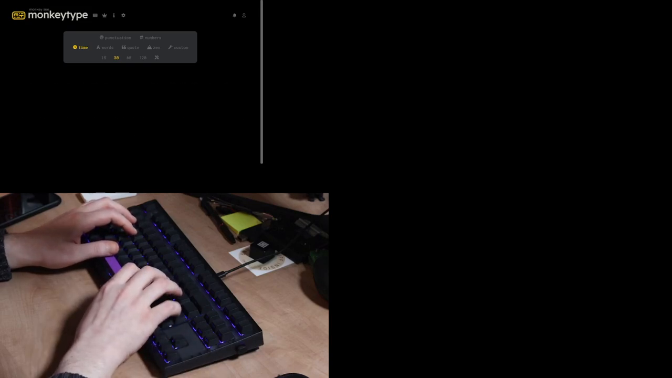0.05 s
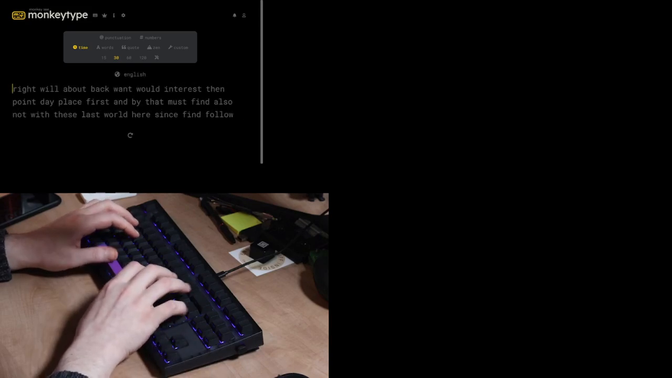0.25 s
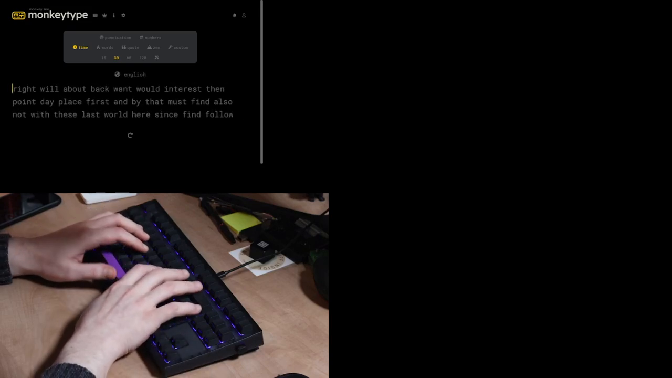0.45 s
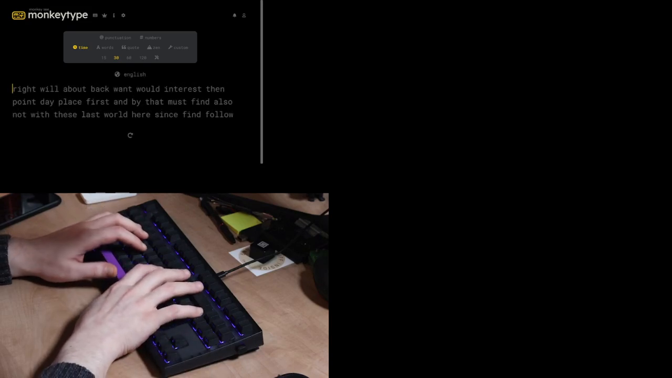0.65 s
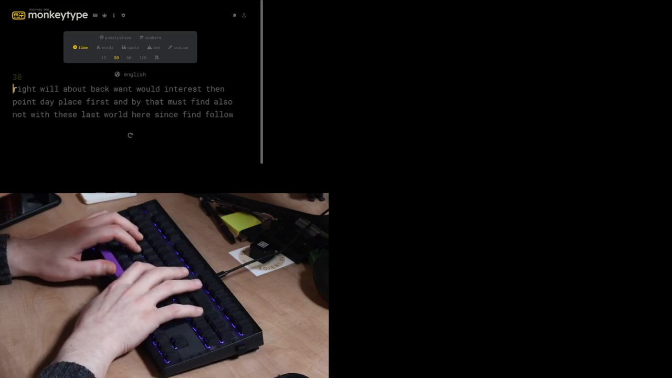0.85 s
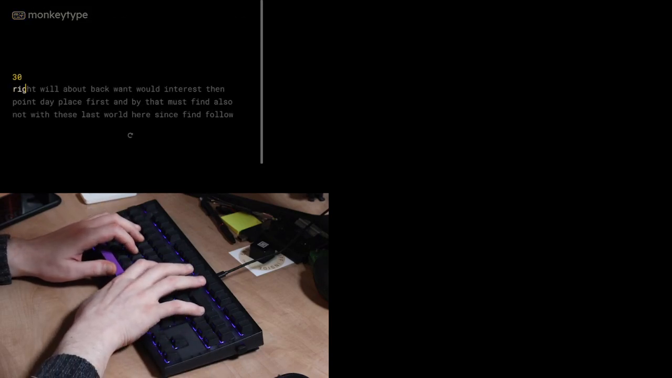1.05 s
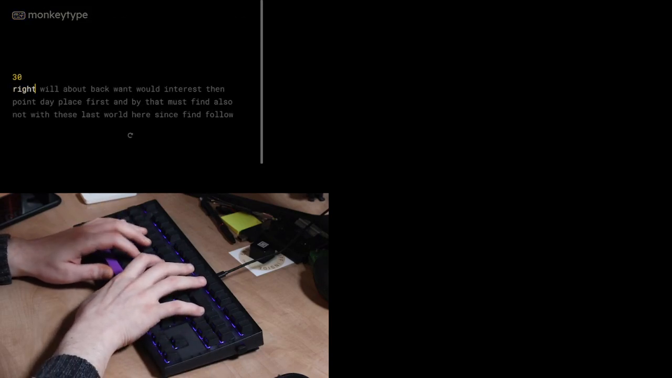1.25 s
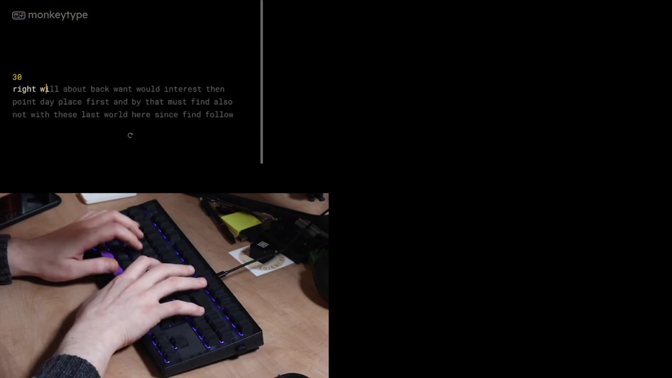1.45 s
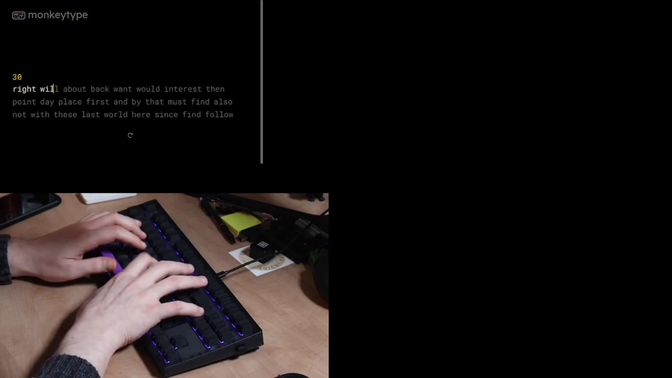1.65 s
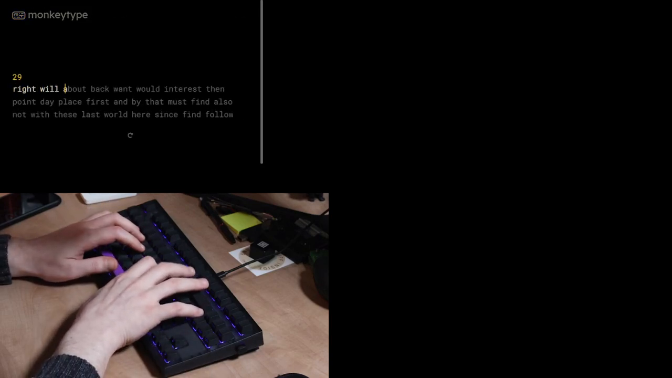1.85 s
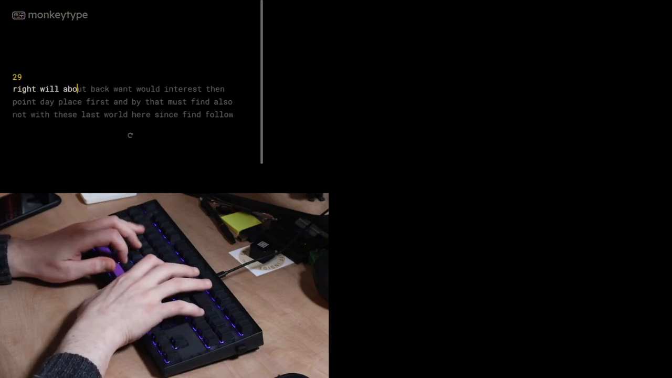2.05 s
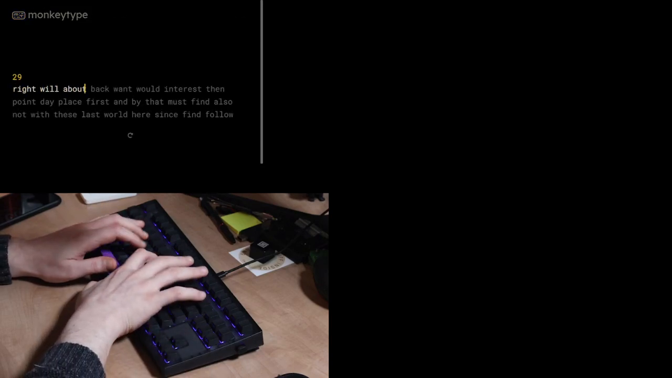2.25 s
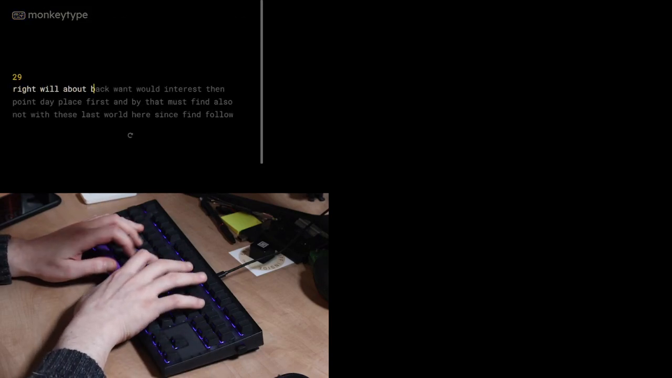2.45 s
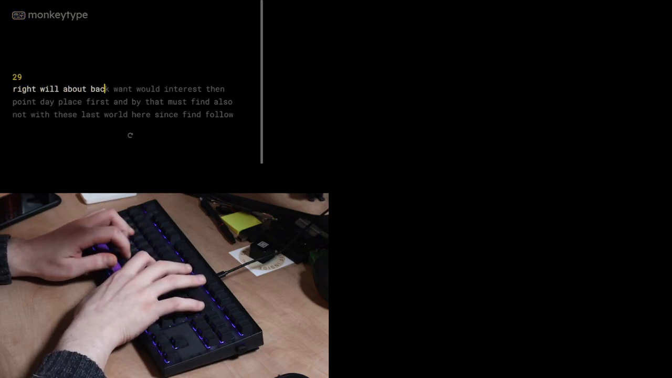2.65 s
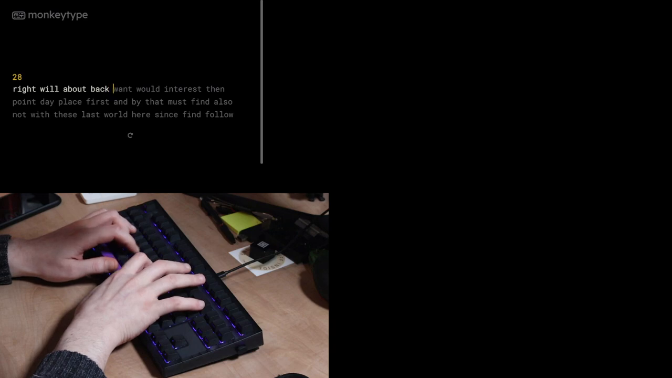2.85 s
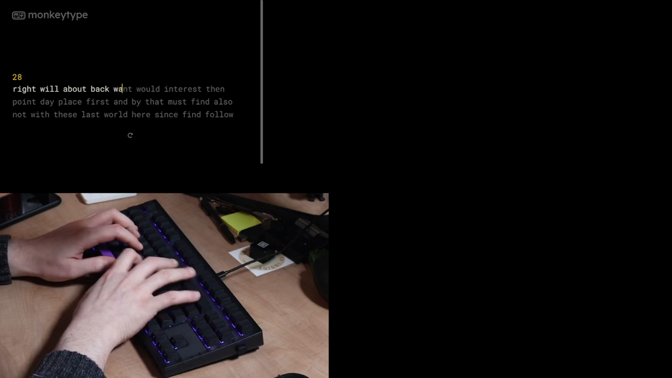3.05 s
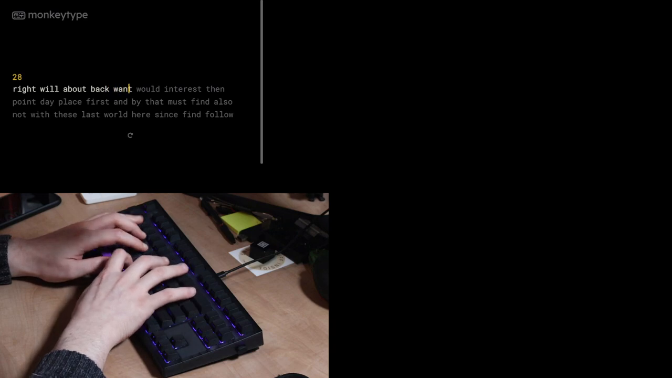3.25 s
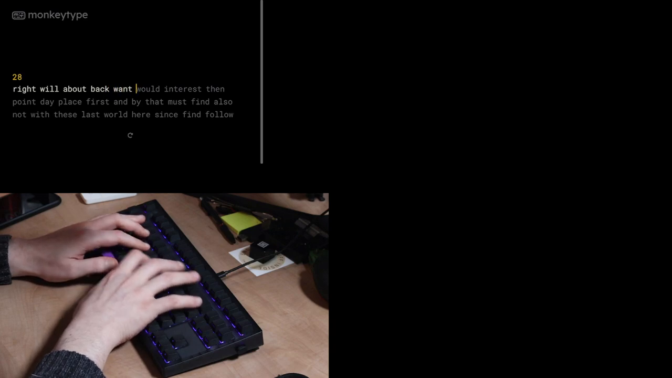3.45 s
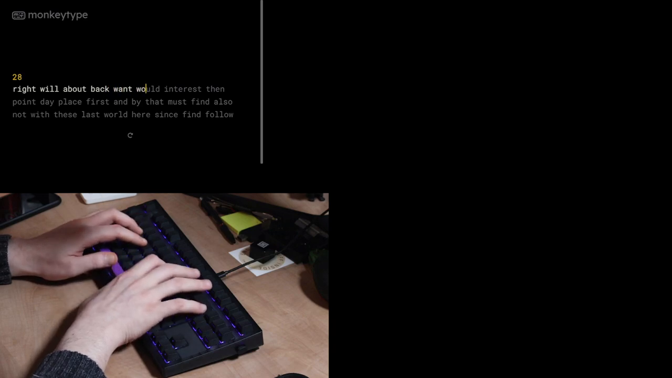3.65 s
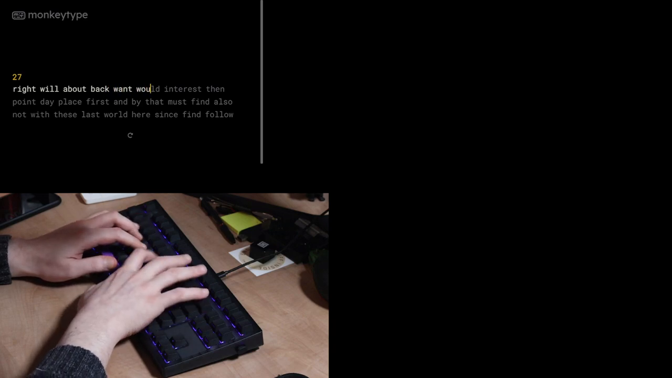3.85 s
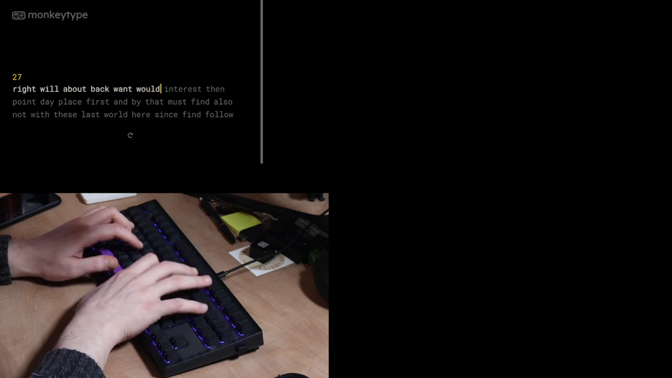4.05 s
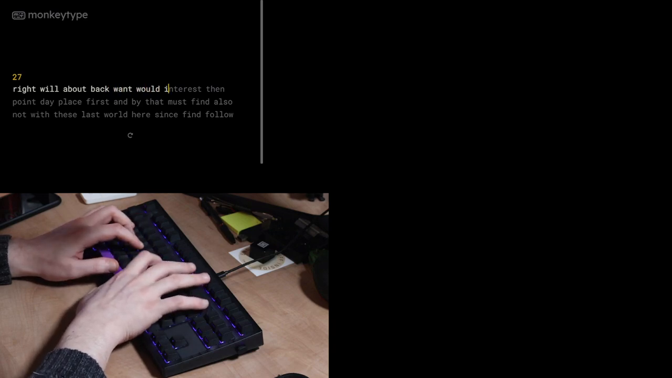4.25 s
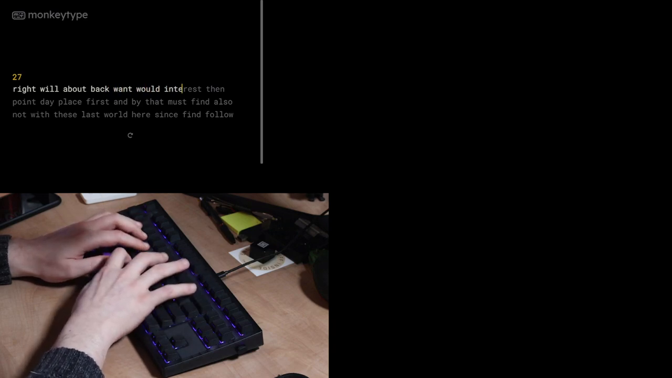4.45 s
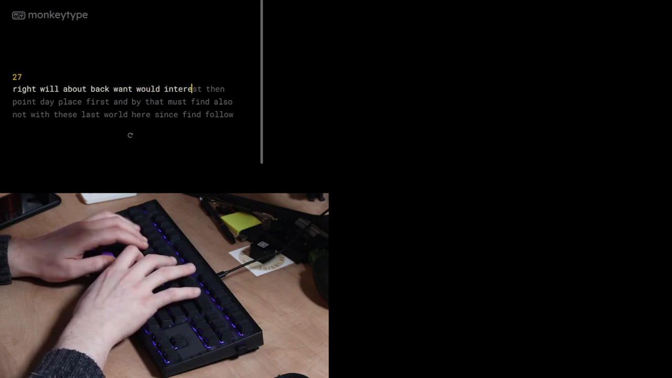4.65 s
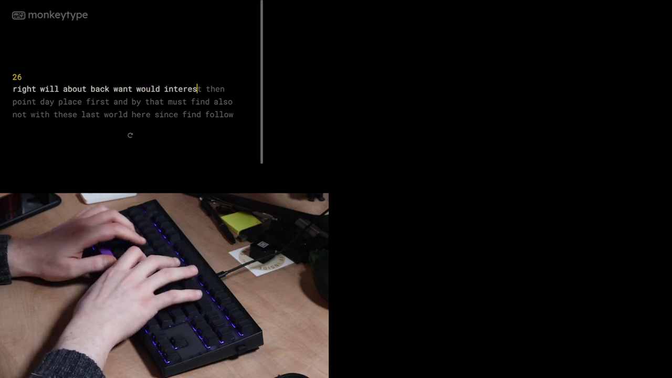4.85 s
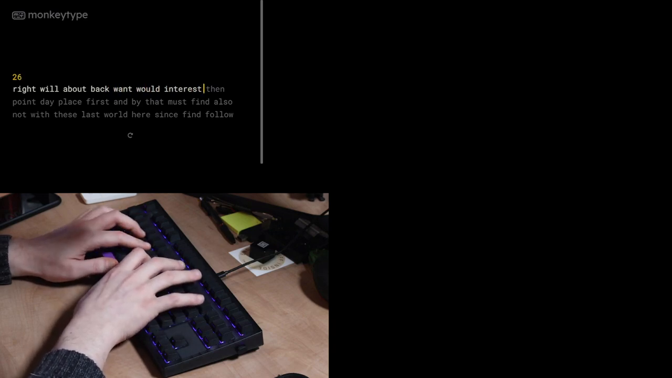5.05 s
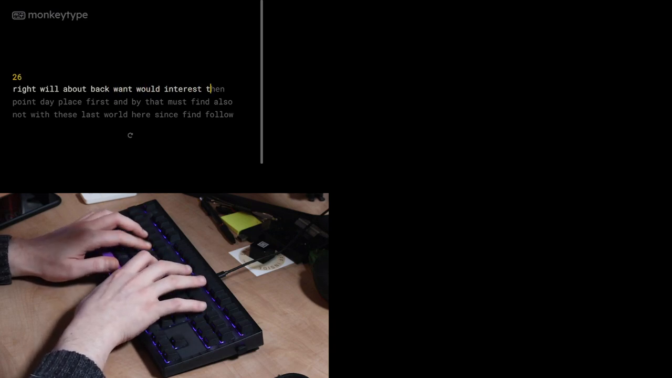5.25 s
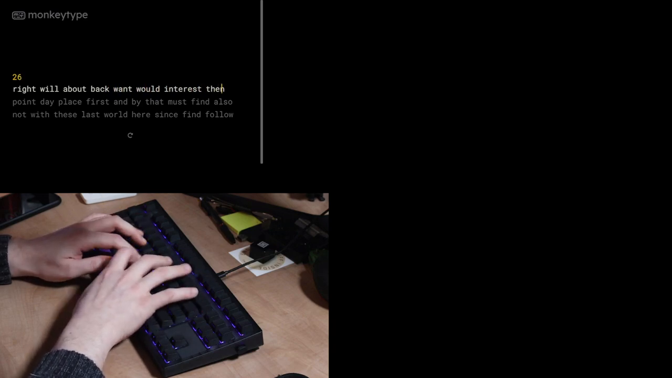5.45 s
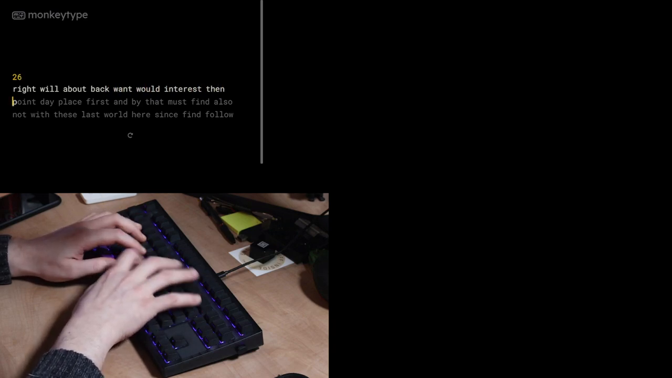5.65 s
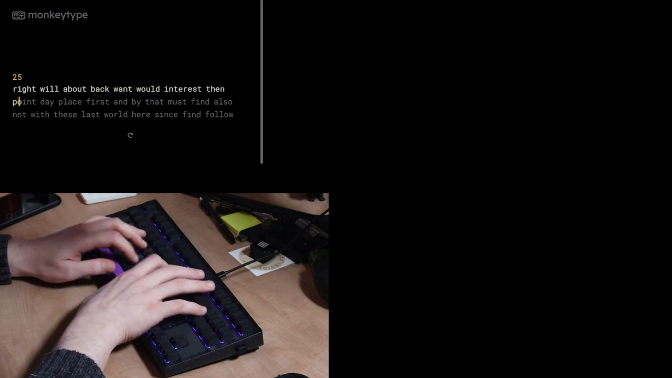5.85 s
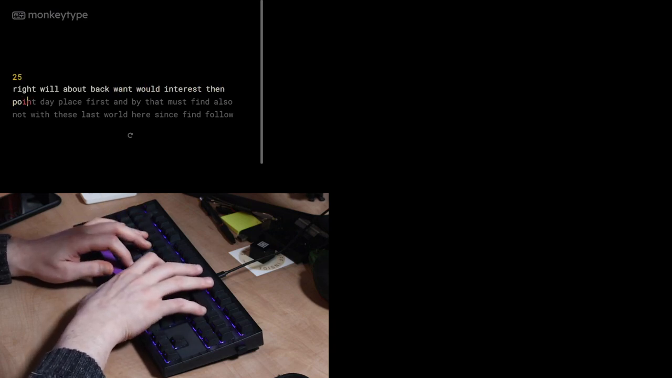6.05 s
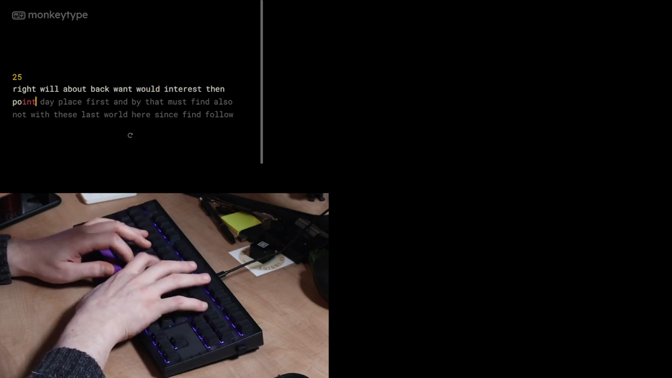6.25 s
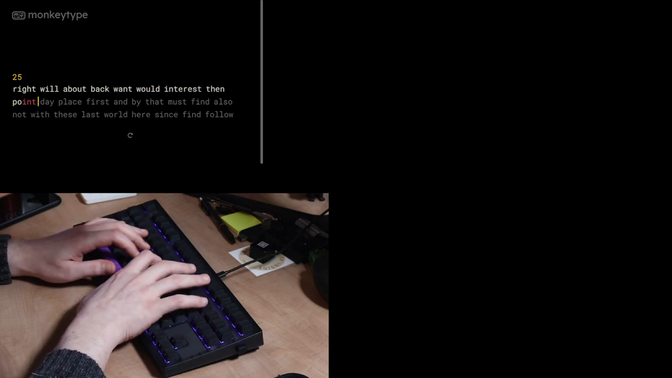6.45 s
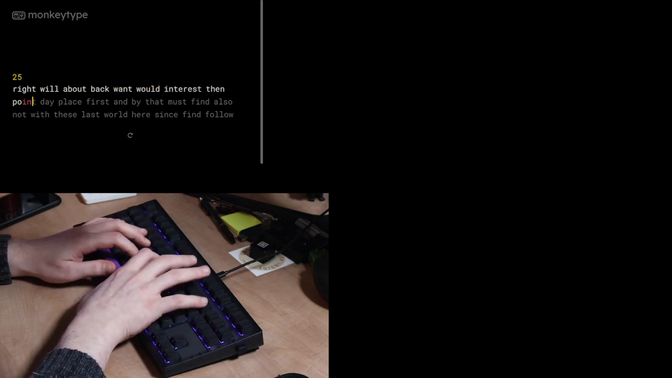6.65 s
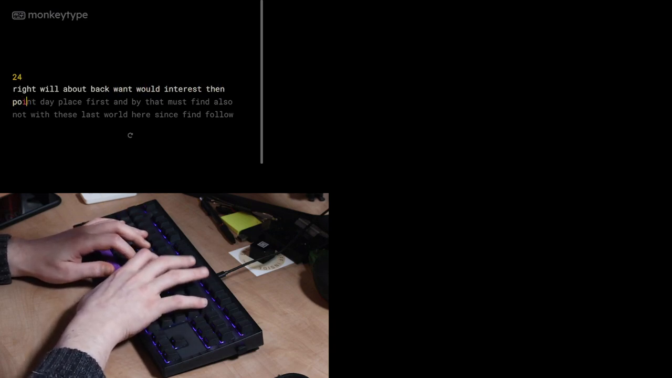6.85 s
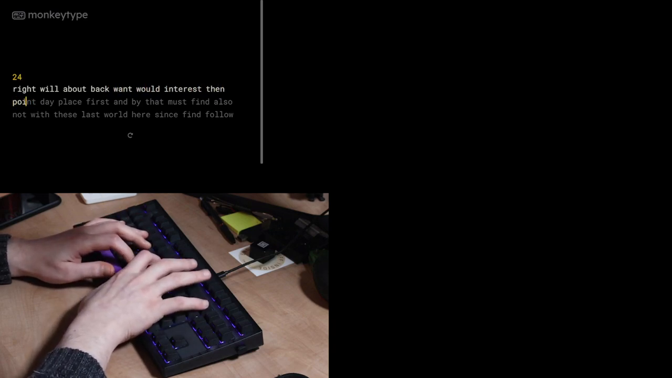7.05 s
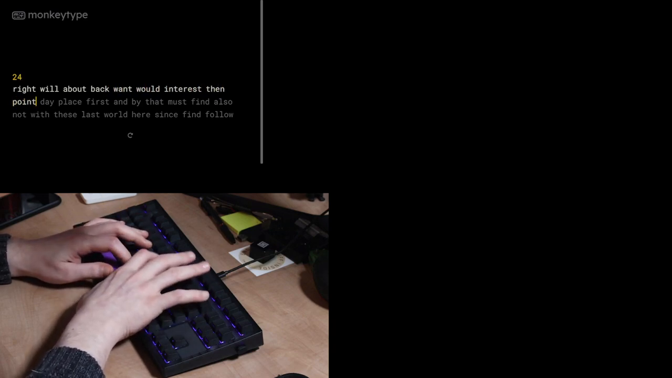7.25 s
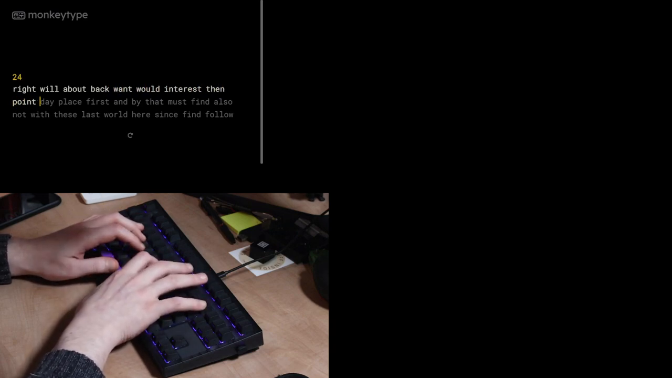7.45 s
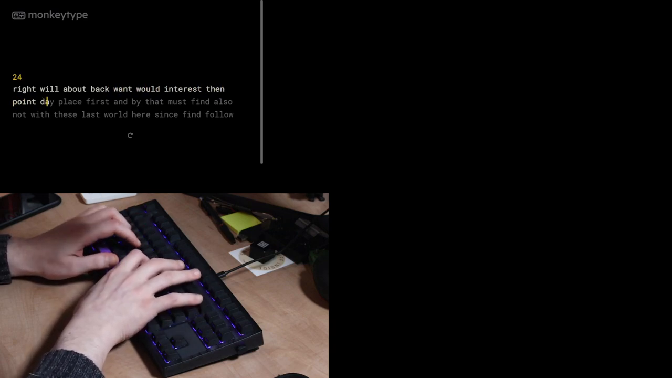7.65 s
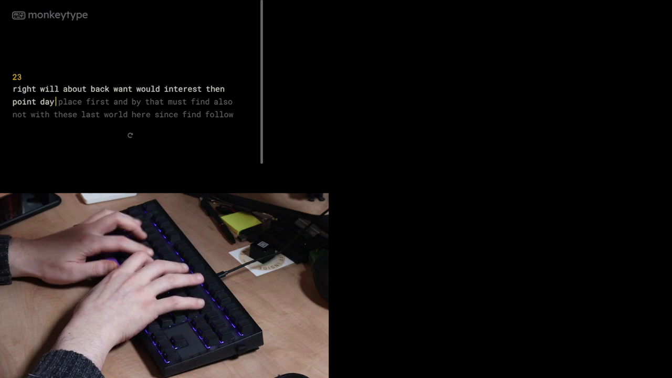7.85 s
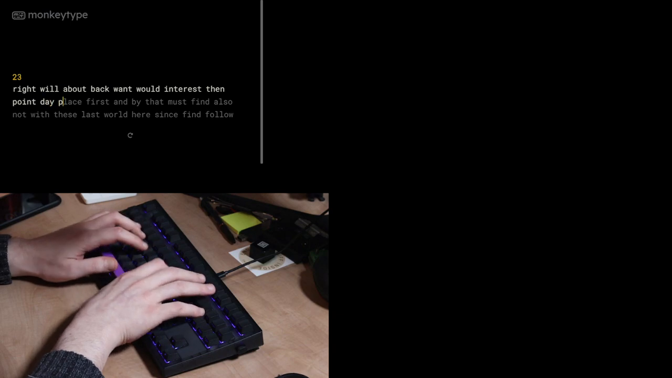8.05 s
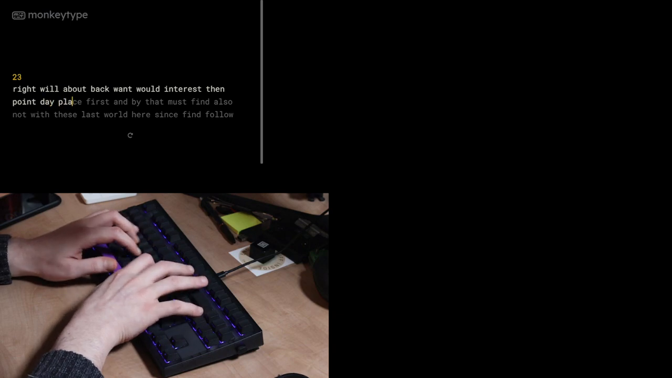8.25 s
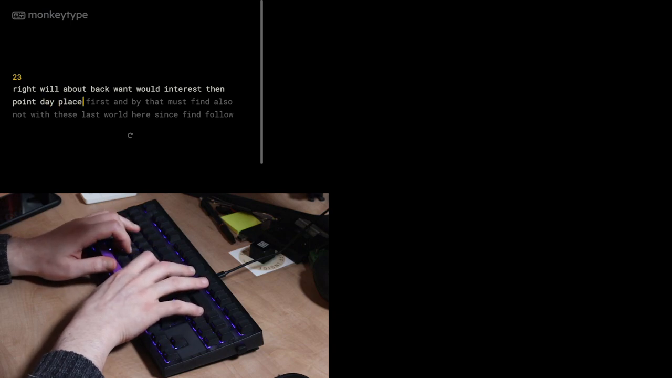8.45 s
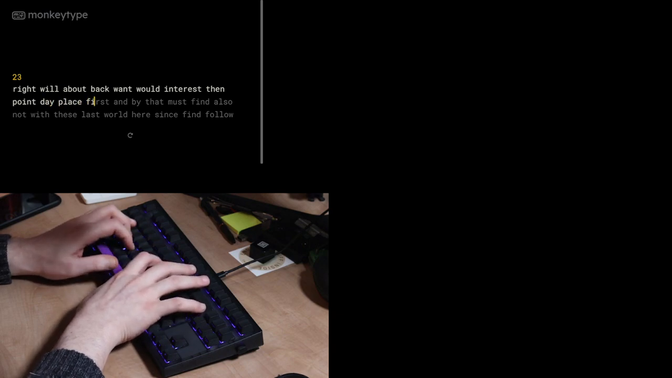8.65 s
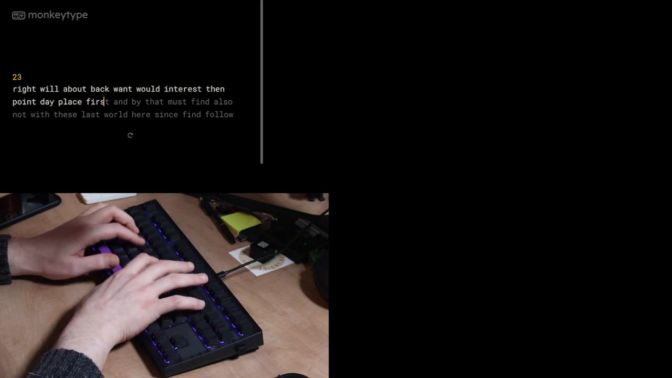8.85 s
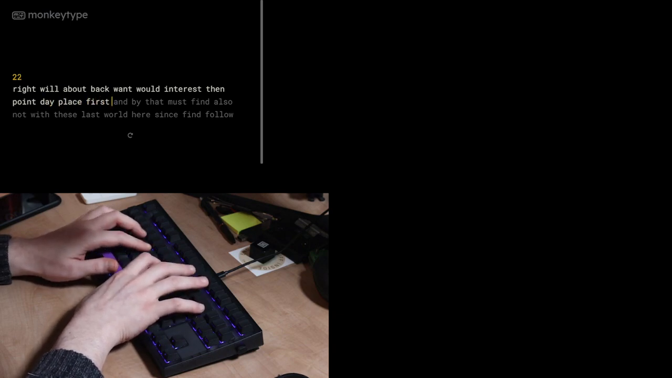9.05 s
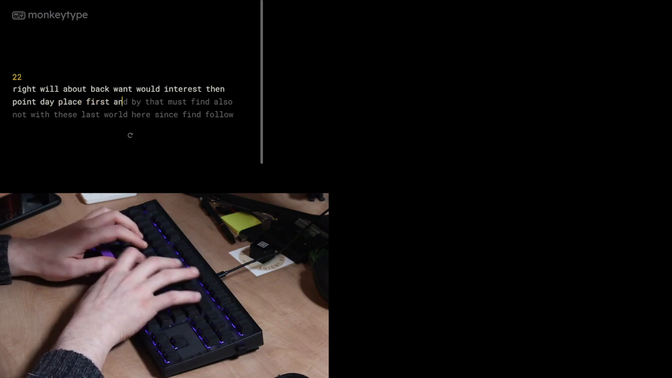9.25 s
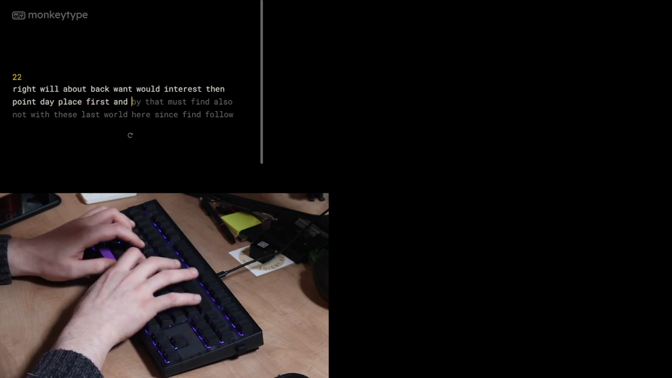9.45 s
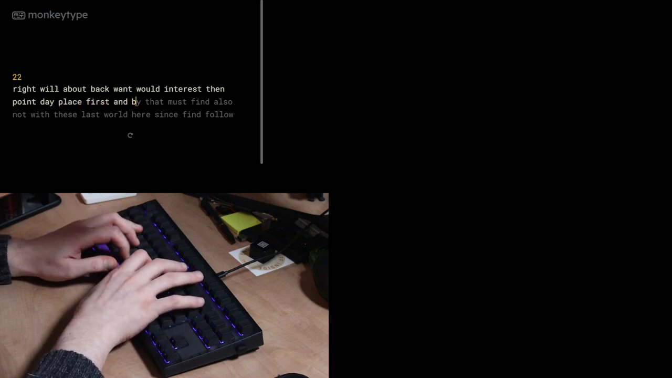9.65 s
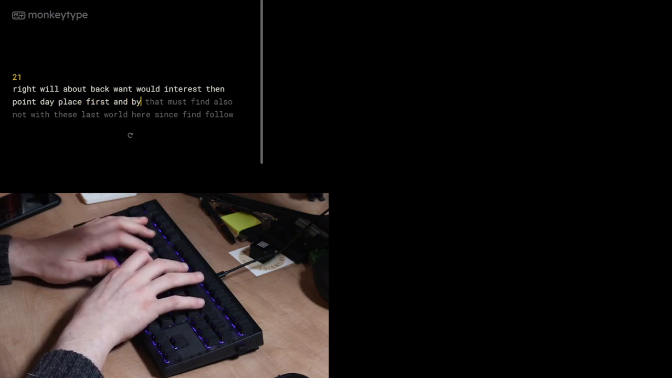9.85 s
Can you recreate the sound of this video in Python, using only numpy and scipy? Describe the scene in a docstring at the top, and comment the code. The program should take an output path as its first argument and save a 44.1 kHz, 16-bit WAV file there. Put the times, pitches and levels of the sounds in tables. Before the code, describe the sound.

A close mono pickup of a mechanical keyboard on a wooden desk in a small, quiet room. A softened space bar contact sounds right at the start, then from 0.1 to 0.4 s and 0.6 to 0.85 s come faint, rattly fingertip nudges on the caps. At about 0.9 s fast typing begins: dry, bright plastic clacks with short snaps, uneven in loudness, mixed with softer key returns and tiny slider ticks. Deeper, hollow space bar thumps land around 1.4, 1.8, 2.4, 2.8, 3.4, 4.1, 5.1 and 5.6 s. Around 6.5, 6.65 and 6.8 s three wide delete key strokes ring with a thin, buzzing metallic edge. Typing resumes at 7.0 s, with space bar thumps near 7.4, 7.9, 8.5, 9.1 and 9.4 s, and runs to nearly 10 s. Short room reflections follow each hit; a very faint low hum lies beneath, and gaps drop almost to silence.

```python
"""Fast typing on a mechanical keyboard

The keyboard stands on a wooden desk in a small quiet room. Each contact of a key (touch, slider tick,
bottoming out, spring return) rings keycap, plate, hollow case and desk as decaying sines, with a noise snap;
the wide delete key adds modes of its cap and guide wire. Decaying noise answers as the room, an appliance
hums faintly, and a noise gate hushes the pauses."""
import sys
import numpy as np
from scipy import signal
from scipy.fft import rfft, irfft, next_fast_len
from scipy.io import wavfile
from scipy.ndimage import uniform_filter1d, map_coordinates

SR = 44100
rng = np.random.default_rng(int(sys.argv[2]) if len(sys.argv) > 2 else 0)


def wrap_up_sound(samples):
    """Save the sound to the file named by the first command line argument, as 16-bit audio."""
    columns = np.atleast_2d(samples).T
    # keep every value between -1 and 1, then stretch to whole-number steps
    tamed = np.clip(columns, -1, 1)
    steps = np.round(tamed * 32767).astype(np.int16)
    wavfile.write(sys.argv[1], SR, steps)


N = 436590
SPAN = SR // 3  # samples that one contact sounds
SHORT = SPAN // 8  # samples that its cap, snap and click sound
SPAN_S, SHORT_S = np.arange(SPAN) / SR, np.arange(SHORT) / SR


def amp(db):
    """Decibels to amplitude."""
    return 10 ** (np.asarray(db) / 20)


def unit(x):
    """Each row at energy 1."""
    return x / np.sqrt(np.sum(x ** 2, axis=-1, keepdims=True) + 1e-20)


def along(points, hz):
    """Interpolate (Hz, value) points on a log frequency axis."""
    f, v = np.transpose(points)
    return np.interp(np.log(hz + 1), np.log(f + 1), v)


def bump(hz, centre_hz, octaves):
    """A bell of height 1 on a log frequency axis."""
    return np.exp(-0.5 * (np.log2((hz + 1) / centre_hz) / octaves) ** 2)


def filtered(x, response):
    """Multiply the spectrum of x by a response of frequency."""
    m = next_fast_len(x.shape[-1] + SR // 10)
    spectrum = rfft(x, m) * response(np.fft.rfftfreq(m, 1 / SR))
    return irfft(spectrum, m)[..., :x.shape[-1]]


def wobble(knots_per_s):
    """A smooth random curve through normal-distributed knots."""
    knots = rng.standard_normal(int(N * knots_per_s / SR) + 4)
    return map_coordinates(knots, [np.arange(N) * knots_per_s / SR])


def hum():
    """Appliance hum: sines that waver in level and phase."""
    # Each row: frequency in Hz, level in dB rms about which it wavers.
    hum_lines = [(120, -67), (242, -76)]
    waver_db = 2.8
    t = np.arange(N) / SR
    total = np.zeros(N)
    for hz, db in hum_lines:
        level = np.sqrt(2) * amp(db + waver_db * wobble(11))
        phase = 0.59 * wobble(4.4) + 0.29 * wobble(30)
        total += level * np.sin(2 * np.pi * hz * t + phase)
    return total


def air():
    """Low room noise: steady coloured noise."""
    # Each row: frequency in Hz, relative spectral level in dB.
    air_colour = [(40, -49), (90, -40), (125, -15.5), (190, -19.5), (260, -13.5), (420, -15), (700, -22),
                  (2000, -22), (16000, -48)]
    rms_db = -74
    noise = filtered(rng.standard_normal(N), lambda hz: amp(along(air_colour, hz)))
    return amp(rms_db) * np.sqrt(N) * unit(noise)


def room(rows):
    """Walls: each contact gets its own noise tail, every frequency dying at its own speed."""
    # Each row: frequency in Hz, t60 in s.
    room_decay = [(100, 0.73), (400, 0.38), (1200, 0.23), (3000, 0.21), (6000, 0.25), (9000, 0.25),
                  (15000, 0.3)]
    noise = rng.standard_normal(rows.shape)
    hz, t, z = signal.stft(noise, SR, nperseg=256)
    z = z * amp(-60 * t / along(room_decay, hz)[:, None])
    tail = signal.istft(z, SR, nperseg=256)[1][:, :SPAN]
    tail = unit(tail * (1 - np.exp(-(SPAN_S / 0.0045) ** 2)))  # the first echoes need a few ms
    return signal.fftconvolve(rows, tail, axes=1)[:, :SPAN]


def ring(modes, count, scatter_db, rise_s):
    """Decaying sines, one row per blow: each mode gets a random strength and sign at every blow."""
    hz, db, t60_s = np.transpose(modes)[:, :, None]
    decay = amp(db - 60 * SPAN_S / t60_s)
    shapes = decay * np.sin(2 * np.pi * hz * SPAN_S) * (1 - np.exp(-SPAN_S / rise_s))
    chance = rng.standard_normal((count, len(modes), 2))
    return (amp(scatter_db * chance[..., 0]) * np.sign(chance[..., 1])) @ shapes


def desk(case_db):
    """Desk: low modes; blows that shake the case reach it too, though less unevenly."""
    # Each row: frequency in Hz, relative level in dB, t60 in s.
    desk_modes = [(72.5, -10.5, 0.16), (127.1, -7, 0.23), (189.2, -4, 0.12)]
    return amp(0.15 * case_db - 20.5) * ring(desk_modes, len(case_db), scatter_db=3.0, rise_s=0.0044)


def case(case_db):
    """Hollow case: slow-rising modes."""
    # Each row: frequency in Hz, relative level in dB, t60 in s.
    case_modes = [(236.2, -3.5, 0.099), (263, -9, 0.14), (381, -1.5, 0.06), (454, -6.5, 0.054),
                  (567, -3, 0.033), (650, -16, 0.073)]
    return amp(case_db + 9.5) * ring(case_modes, len(case_db), scatter_db=1.5, rise_s=0.0069)


def wide_cap_and_wire(wire_db):
    """Wide cap and steel guide wire of the delete key: ringing modes, some in close pairs; the wire
    sits loosely and buzzes."""
    # Each row: frequency in Hz, relative level in dB, t60 in s.
    wide_key_modes = [(1151, 9, 0.16), (4270, 4, 0.2), (4260, -18.5, 0.15), (5200, -18, .06),
                      (6800, -19, 0.025), (7000, -3, 0.11)]
    ringing = amp(wire_db) * ring(wide_key_modes, len(wire_db), scatter_db=3.5, rise_s=0.0015)
    buzz = filtered(rng.standard_normal(ringing.shape), lambda hz: hz < 150)
    return ringing * (1 + 0.45 * buzz / buzz.std())


def cap_and_plate(cap_hz, plate_db, light):
    """Cap and mounting plate: decaying modes, struck once if firm, dragged out into a scrape if light."""
    # Each row: frequency in Hz, relative level in dB, t60 in s.
    plate_modes = [(681.4, -10, 0.055), (970, -3, 0.034), (1179.5, -1, 0.048), (1211, -3, 0.024),
                   (1383, 0, 0.012), (1461, 5, 0.033), (1716, 3.5, 0.016), (1828, -2, 0.034),
                   (1992, 2.5, 0.019), (2307, 12, 0.0078), (2620, 18, 0.0048), (3596, 8.5, 0.0055)]
    count = len(cap_hz)
    # the thin cap walls damp fast, the higher the faster
    t60_s = 0.024 * (1300 / cap_hz) ** 1.5
    cap = np.sin(2 * np.pi * cap_hz * SHORT_S) * amp(-60 * SHORT_S / t60_s)
    cap += 0.5 * np.sin(2 * np.pi * 1.45 * cap_hz * SHORT_S) * amp(-120 * SHORT_S / t60_s)
    cap *= 1 - np.exp(-(SHORT_S / 0.00097) ** 2)
    plate = amp(plate_db - 9) * ring(plate_modes, count, scatter_db=4.5, rise_s=0.001)[:, :SHORT]
    body = amp(-1.5) * cap + plate
    scrape = light * unit(rng.standard_normal((count, SHORT)) * np.exp(-SHORT_S / 0.0017))
    scrape[:, 0] = 1  # the impact itself
    body = signal.fftconvolve(body, unit(scrape), axes=1)[:, :SHORT]
    return filtered(body, lambda hz: 1 / (1 + (800 / (hz + 1)) ** 4))  # small parts radiate no bass


def snap_colour(hz, top_db, rattle_db):
    """Spectrum of the snap: top_db tilts the treble, a loose or wide cap rattles on its stem."""
    # Each row: frequency in Hz, relative spectral level in dB.
    snap_points = [(1500, -14), (3000, 8.5), (4500, -0.5), (5800, -2), (7600, -5), (8400, -2.5),
                   (9100, -0.5), (10200, -19), (13000, -17.5), (16000, -44)]
    top = np.clip(np.log2((hz + 1) / 6500) * 2, 0, 1)
    rattle = bump(hz, centre_hz=5640, octaves=0.16)
    return amp(along(snap_points, hz) + top_db * top + rattle_db * rattle)


def snap(snap_db, light, bright):
    """Snap: a short decaying noise burst."""
    fade = np.exp(-SHORT_S / 0.0028) + (0.6 + 0.1 * light) * np.exp(-SHORT_S / 0.002)
    burst = rng.standard_normal((len(snap_db), SHORT)) * fade
    return amp(snap_db + 20) * unit(filtered(burst, bright))


def click(colour):
    """A coloured impulse of energy 1."""
    impulse = np.zeros(SHORT)
    impulse[SPAN // 200] = 1
    return unit(filtered(impulse, colour))


def loose_caps(cap_hz, snap_db, top_db, bright):
    """Sideways, all loose caps answer in a broad click, most near the struck pitch; the springs sizzle."""
    # Each row: frequency in Hz, relative spectral level in dB.
    clatter_points = [(450, -20.5), (800, -12), (1200, 0), (1600, 0), (2600, -3.5), (4000, -12.5),
                      (7000, -42.5)]
    own_db, own_octaves = 1.5, 0.41
    spring_hz, spring_octaves, spring_db = 9020, 0.04, -2.5
    clatter = click(lambda hz: amp(along(clatter_points, hz) + own_db * bump(hz, cap_hz, own_octaves)))
    sizzle = click(lambda hz: bump(hz, spring_hz, spring_octaves))
    loose = amp(3) * clatter + amp(snap_db + 12.5) * click(bright)
    return loose + amp(snap_db + top_db + spring_db) * sizzle


def contacts(keys):
    """Sum the parts: one row per contact, as heard directly and as sent to the walls."""
    _, db, cap_hz, snap_db, plate_db, top_db, case_db, wire_db, rattle_db = keys.T[:, :, None]
    light = np.clip(amp(-0.8 * (db + 34.5)), 0, 3)  # grows as the blow gets softer
    bright = lambda hz: snap_colour(hz, top_db, rattle_db)
    body = cap_and_plate(cap_hz, plate_db, light)
    crack = amp(snap_db + 14) * click(bright) / (1 + light)  # the stem meets the housing floor
    lower = case(case_db) + desk(case_db)
    loose = loose_caps(cap_hz, snap_db, top_db, bright)
    longer = lambda x: np.pad(x, ((0, 0), (0, SPAN - SHORT)))
    direct = longer(body + snap(snap_db, light, bright) + crack) + lower + wide_cap_and_wire(wire_db)
    spread = longer(amp(-13.0) * body + loose) + amp(-7) * lower
    return amp(db) * direct, amp(db) * spread


def key_contacts():
    """One row per contact: start s, level dB, cap Hz, then snap, plate, top, case, wire, rattle in dB.

    The dB after cap Hz are settings of the parts, relative to the level of the contact.
    Wire stands for the modes of the wide cap and its guide wire."""
    # Letters bottoming out and returning. Each row: start in seconds, level in dB, cap pitch in Hz,
    # snap in dB, top of the snap in dB.
    letters = [(0.9246, -26, 1310, -12.5, -6.5), (0.9932, -23, 1376, -11.5, -5),
               (1.072, -25.5, 1530, -15.5, -4), (1.133, -39, 1154, -18, -1), (1.1551, -27.5, 1880, -18, -3),
               (1.2246, -25, 1300, -12, -10), (1.285, -21.5, 1300, -15, -1.5),
               (1.4524, -17.5, 1330, -21, -3.5), (1.5132, -18.5, 1504, -15, -6),
               (1.5405, -26.5, 1470, -13, -9), (1.5809, -32, 1510, -16, -9),
               (1.6757, -38.5, 2710, -0.5, -8.5), (1.726, -45, 1200, -3, -9.5),
               (1.7769, -31, 1210, -6.5, -5), (1.8901, -19.5, 1200, -12, -9),
               (1.9902, -21.5, 1814, -16, -6), (2.0383, -25, 1206, -10.5, -8),
               (2.0805, -30.5, 2360, -15.5, -1), (2.1114, -34.5, 1210, -8.5, -1.5),
               (2.2062, -26.5, 1320, -13.5, -1.5), (2.2747, -24, 1290, -16.5, -8),
               (2.373, -25.5, 2870, -6, -5), (2.452, -40, 1380, -16, 0), (2.4757, -21.5, 1290, -13.5, -4),
               (2.5374, -19, 1196, -17, -9.5), (2.579, -30, 1760, -16, -2), (2.6368, -36, 1880, -15, -4),
               (2.6537, -21.5, 1850, -18.5, -1), (2.736, -26.5, 2450, -12.5, -3),
               (2.773, -27.5, 1800, -25, -6), (2.9402, -21, 1495, -20, 0.5),
               (3.0653, -23.5, 1570, -15, -1.5), (3.1188, -32.5, 1500, -15.5, -3),
               (3.1632, -35.5, 1450, -10, 1), (3.2047, -21, 1860, -23, -7), (3.2974, -38, 1116, -18, -2),
               (3.3273, -36, 1330, -24, -2), (3.5703, -26, 1370, -28.5, 3), (3.6291, -27, 1210, -11.5, -7),
               (3.6572, -30.5, 1500, -23, 6), (3.701, -43, 1460, -5.5, -7), (3.8084, -23, 1250, -16, -8.5),
               (3.8733, -32.5, 1214, -19, -6), (3.9804, -28.5, 1245, -7, -2),
               (4.0367, -39.5, 2500, -10, -6), (4.06, -41, 1200, -10, -1), (4.1897, -21.5, 1550, -12, -5),
               (4.2594, -32, 2620, -14, -13), (4.343, -19, 1840, -18.5, -7.5),
               (4.4113, -35.5, 1320, -25, -6), (4.4302, -31, 1197, -21, 3),
               (4.4653, -20.5, 1410, -11.5, -2.5), (4.561, -26.5, 1330, -16.5, -3),
               (4.6568, -23, 1436, -14.5, -1), (4.7563, -26, 1410, -8, 0), (4.8249, -23.5, 1510, -15, -8),
               (4.9349, -28.5, 1250, -14, -10), (5.1991, -25, 1335, -15.5, -0.5),
               (5.2843, -35.5, 1600, -6.5, -2), (5.2937, -31.5, 1164, -15, -2),
               (5.3631, -24, 1320, -19, -7), (5.4203, -23, 1480, -13, -4), (5.458, -35.5, 1080, -14, -6),
               (5.4938, -17.5, 1820, -22.5, 1), (5.7298, -26.5, 1680, -10.5, -2.5),
               (5.8197, -36.5, 1600, -8, -2), (5.903, -23.5, 1256, -20.5, -4),
               (6.1067, -22.5, 1550, -12, -12), (6.1905, -36, 2500, -17, -21),
               (6.2567, -25.5, 1970, -28, -1), (6.3295, -20, 1440, -17.5, -2.5),
               (6.4345, -45, 1710, -22, -11), (7.0349, -25.5, 1150, -21, -14),
               (7.0524, -20, 1600, -11.5, -16.5), (7.127, -37.5, 2460, -16, -15),
               (7.1645, -26, 1570, -28, -5), (7.2386, -22.5, 1300, -17, -3), (7.2686, -26, 2440, -16, -4),
               (7.6119, -21, 2590, -17.5, -5), (7.6877, -22, 1256, -15, -2), (7.723, -22.5, 2300, -23.5, 4),
               (7.7536, -39, 1510, -14, -5), (7.8069, -32.5, 1480, -18, -2),
               (8.0306, -27, 1295, -9.5, -5.5), (8.103, -29, 2550, -9, -4.5),
               (8.179, -27, 1207, -12.5, -11), (8.2271, -19, 2510, -17, -1.5),
               (8.331, -20, 1830, -17.5, -1.5), (8.4168, -25, 1450, -17, -6), (8.4507, -28, 1480, -22, 4),
               (8.5866, -24, 1620, -12, -4), (8.646, -20, 1446, -16, -2.5), (8.757, -25, 1310, -13, -3.5),
               (8.8509, -23, 1510, -16, -5.5), (8.9455, -25, 1290, -17.5, -3), (9.143, -19.5, 2500, -17, 2),
               (9.2166, -35.5, 1450, -9, 2), (9.2497, -22, 1360, -30, 1), (9.3124, -38, 1166, -15, 4),
               (9.334, -36, 2450, -21, -4), (9.6532, -26, 1300, -17.5, -1), (9.7254, -28, 2270, -16.5, 1),
               (9.8166, -43, 1200, -24, -11), (9.8319, -31.5, 1174, -17.5, -12),
               (8.511, -35, 2000, -13, -4), (8.658, -27.5, 1450, -17, -3), (4.766, -37.5, 2400, -12, -6)]
    # Resting fingers nudge the caps. Each row: start in seconds, level in dB, snap in dB.
    touches = [(0.0901, -41, -10.5), (0.142, -34.5, -27), (0.2385, -39.5, -21), (0.255, -49, -14),
               (0.2834, -49, -12), (0.3089, -41, -17), (0.353, -49, -15), (0.3887, -50.5, -20),
               (0.6213, -44.5, -23), (0.708, -49, -24), (0.8036, -45.5, -18), (0.833, -56, -20)]
    # A slider ticks on its way down. Each row: start in seconds, level in dB, snap in dB.
    ticks = [(1.369, -32.5, -16.5), (1.865, -50, -6.5), (3.044, -44.5, -16), (4.102, -34, -19),
             (4.329, -41.5, -14), (4.919, -41, -13), (5.085, -36, -19), (5.266, -45, -13),
             (6.086, -28, -18.5), (6.471, -45, -9), (6.634, -51, -4), (7.347, -40.5, -24),
             (7.674, -44, -17), (8.307, -37.5, -11.5), (8.735, -52, -16), (9.040, -41.5, -21),
             (9.640, -50, -8)]
    # Space bar going down. Each row: start in seconds, level in dB, case in dB.
    space_down = [(-0.0025, -27, -25), (1.3979, -21.5, -23), (1.8248, -18, -21.5), (2.3534, -20.5, -20.5),
                  (2.827, -22.5, -22.5), (3.4095, -20, -21), (4.1146, -24.5, -22), (5.0984, -25.5, -20.5),
                  (5.5681, -21.5, -24), (7.3662, -22, -19), (7.9035, -20, -21), (8.482, -18, -21.5),
                  (9.0633, -20, -20), (9.41, -22, -20.5)]
    # Space bar coming up, delete key going down, coming up. Each row: start in seconds, level in dB.
    space_up = [(2.4314, -40), (3.496, -42), (4.1782, -31), (5.1605, -41.5), (7.4612, -38), (8.5712, -33.5)]
    delete_down = [(6.494, -23.5), (6.6555, -22.5), (6.8157, -27.5)]
    delete_up = [(6.5844, -44), (6.7476, -48), (6.8988, -47), (6.9632, -44.5)]
    silent_db, firm_db = -99, -24
    rows = []
    for s, db, cap_hz, snap_db, top_db in letters:
        lag_db = 0.17 * (db - firm_db)  # plate and case fall behind in a harder blow
        rows.append((s, db, cap_hz, snap_db, -6.5 - lag_db, top_db, -37 - lag_db, silent_db, 0))
    for s, db, snap_db in touches:
        rows.append((s, db, 1320, snap_db, -8, -7, -36, silent_db, 7.1))
    for s, db, snap_db in ticks:
        rows.append((s, db, 1450, snap_db, -3, -1, -33.5, silent_db, 1.5))
    for s, db, case_db in space_down:
        rows.append((s, db, 1260, -14, -5, -7.5, case_db, silent_db, 9))
    for s, db in space_up:
        rows.append((s, db, 1080, -20.5, 0.67, -17, -19.5, silent_db, 4))
    for s, db in delete_down:
        rows.append((s, db, 1114, -17, -7.5, -12.5, -26, -34, 1))
    for s, db in delete_up:
        rows.append((s, db, 1070, -6.5, -0.55, -24, -17.5, -25, 1.3))
    return np.array(rows)


def typing():
    """Place every contact, with its room answer, at its moment."""
    keys = key_contacts()
    direct, spread = contacts(keys)
    out = np.zeros(N + 2 * SPAN)  # SPAN spare samples at each end
    for start_s, row in zip(keys[:, 0], direct + room(spread)):
        out[SPAN + round(start_s * SR):][:SPAN] += row
    return out[SPAN:SPAN + N]


def scene():
    """Keys, hum and room noise at one microphone."""
    return (hum() + air() + typing())[None]


def gate(x, open_db, slope, depth_db, release_s):
    """Noise gate: gain falls when the sound above the hum has been quiet for a while."""
    power = filtered(x, lambda hz: hz > 800) ** 2
    keep = np.exp(-1 / (release_s * SR))
    recent = signal.lfilter([1 - keep], [1, -keep], power, axis=1)
    recent_db = 10 * np.log10(np.abs(recent) + 1e-14)
    gain = amp(np.clip(slope * (recent_db - open_db), -depth_db, 0))
    return x * uniform_filter1d(gain, size=SR // 200, axis=1)


def record(dry):
    """A noise gate, a bass cut, and nothing above the band limit."""
    top_hz, bass_hz = 16400, 62
    gated = gate(dry, open_db=-47.5, slope=0.63, depth_db=22, release_s=0.054)
    return filtered(gated, lambda hz: (hz < top_hz) / (1 + (bass_hz / (hz + 1)) ** 4))


dry = scene()
out = record(dry)
wrap_up_sound(out)
```